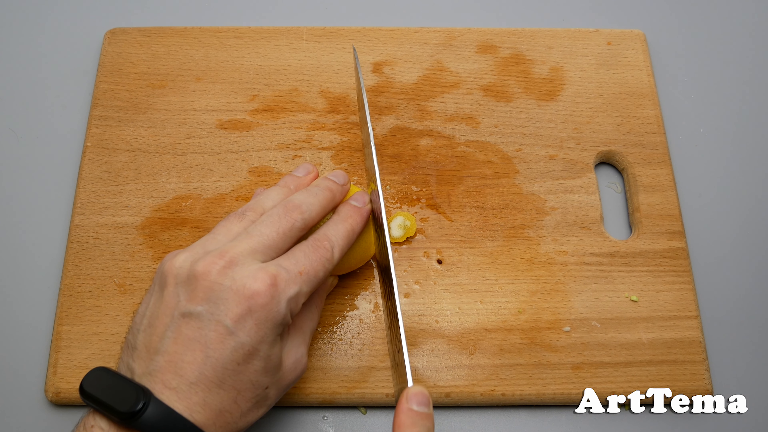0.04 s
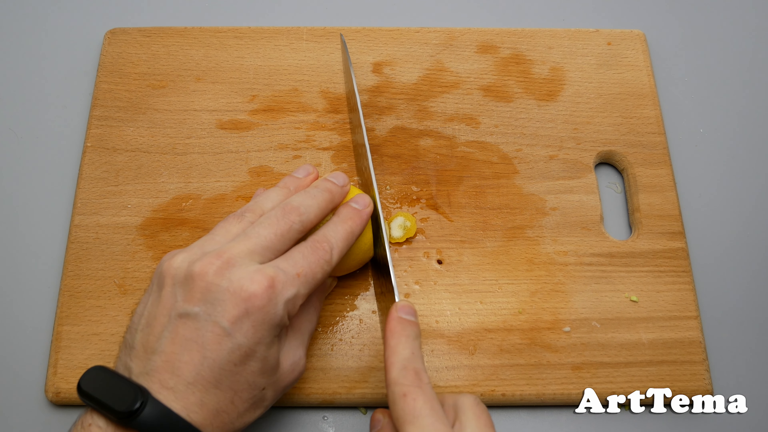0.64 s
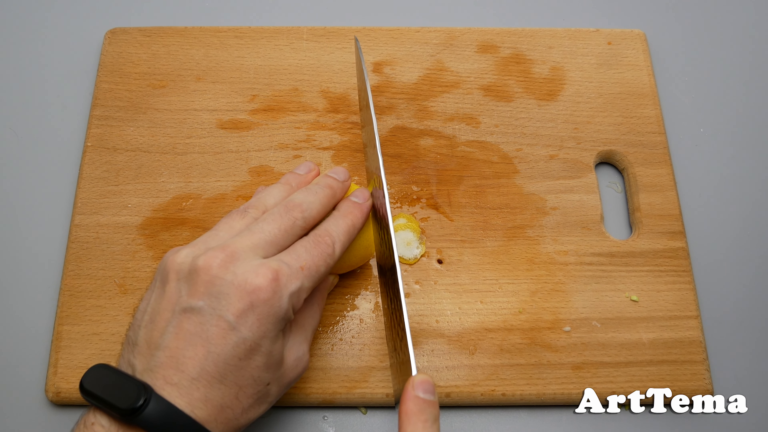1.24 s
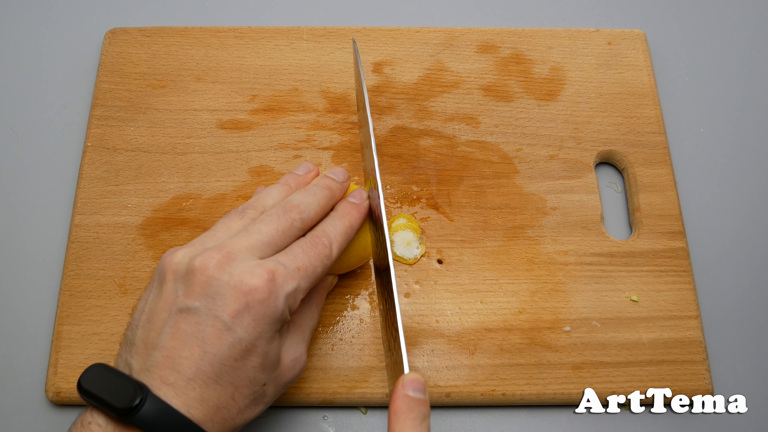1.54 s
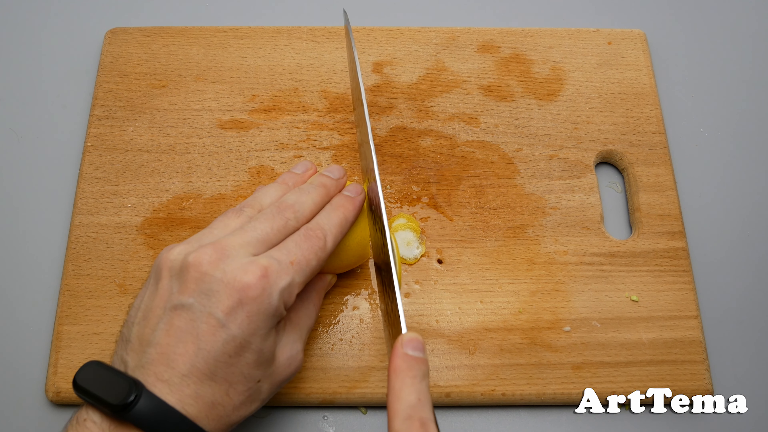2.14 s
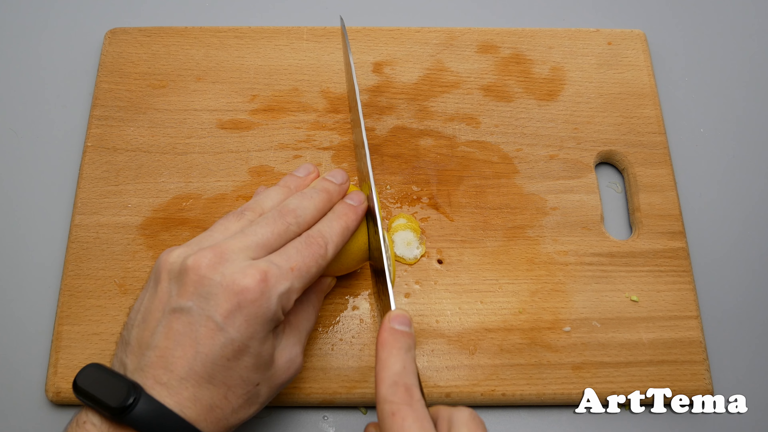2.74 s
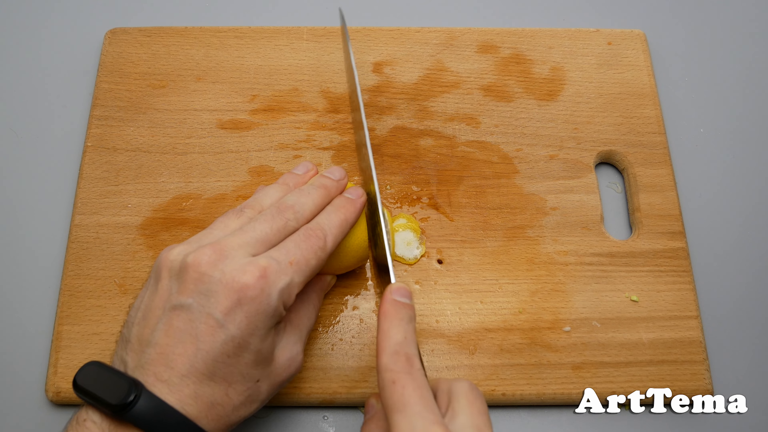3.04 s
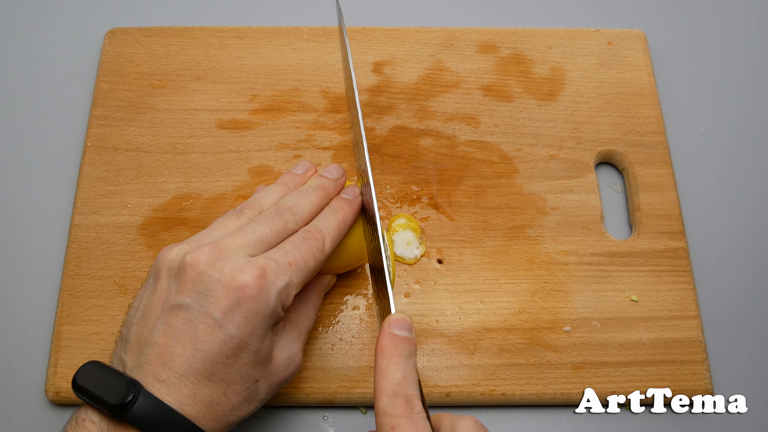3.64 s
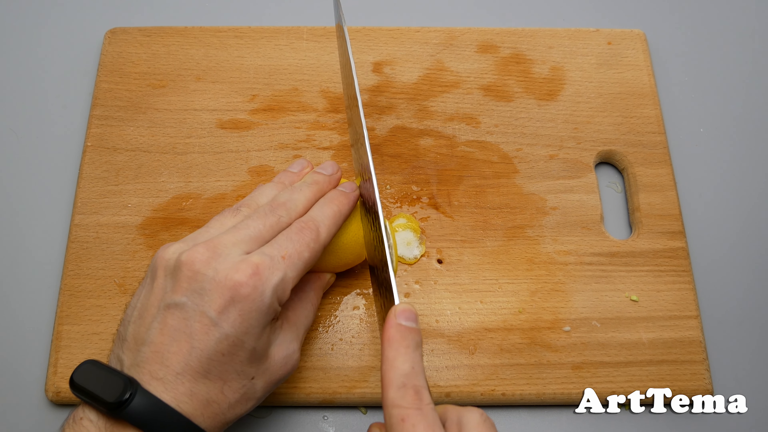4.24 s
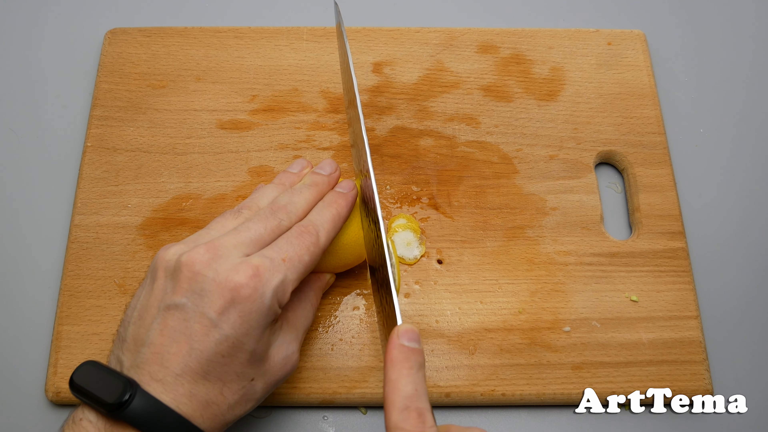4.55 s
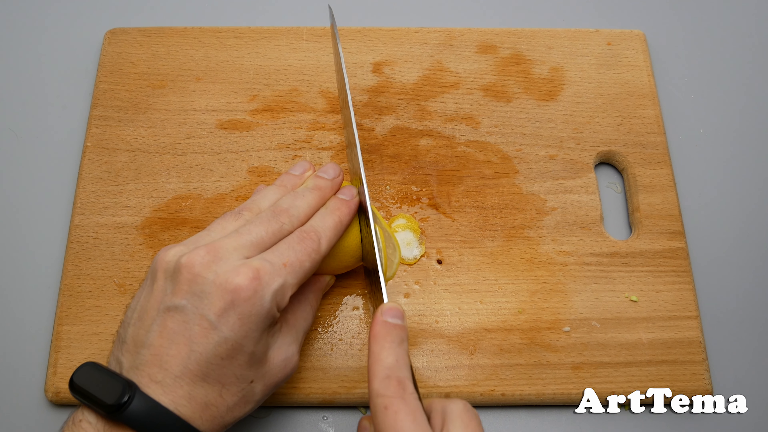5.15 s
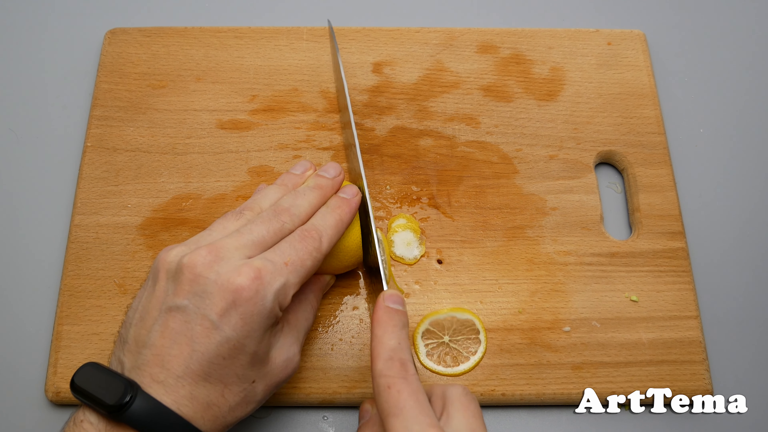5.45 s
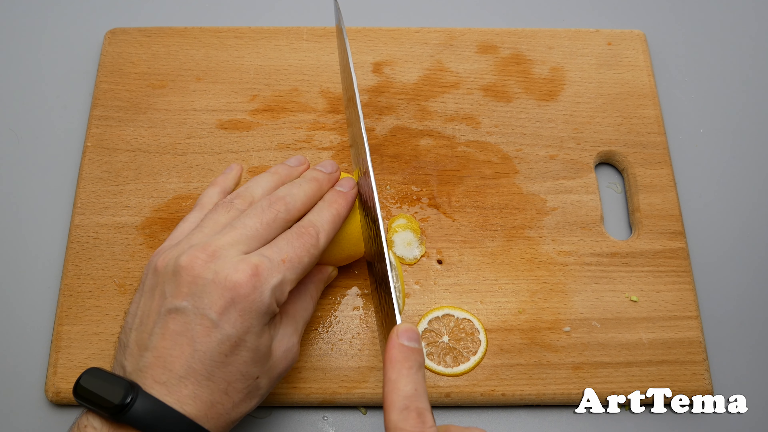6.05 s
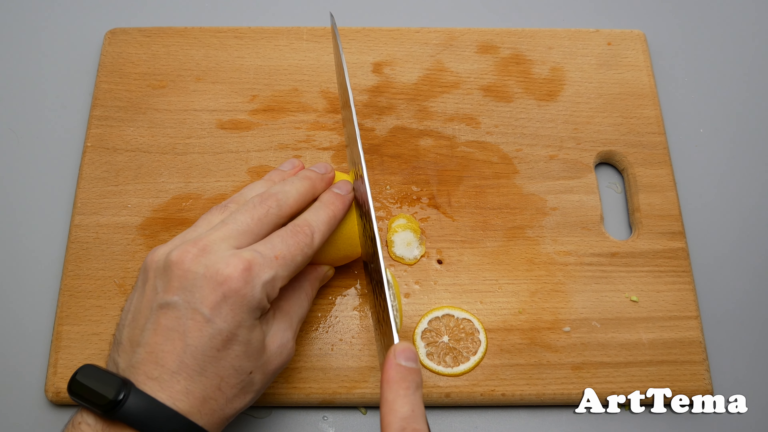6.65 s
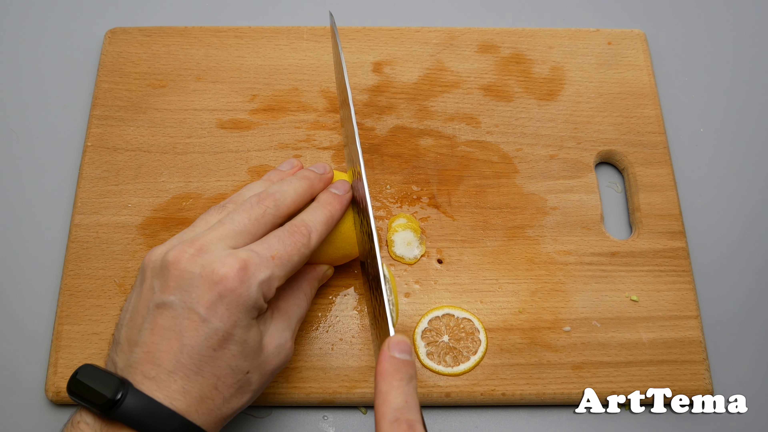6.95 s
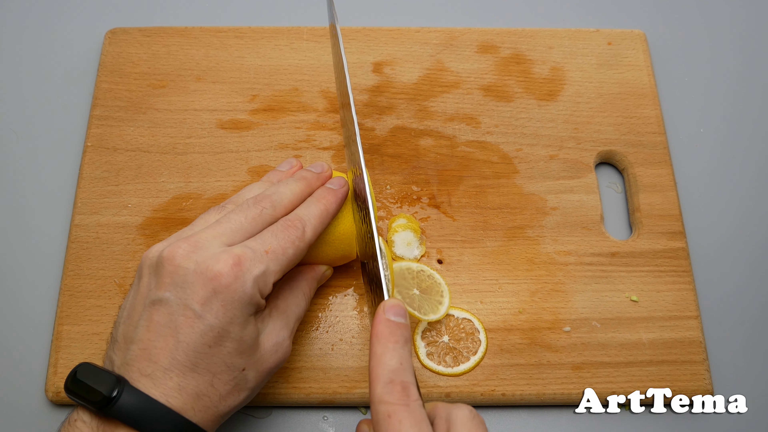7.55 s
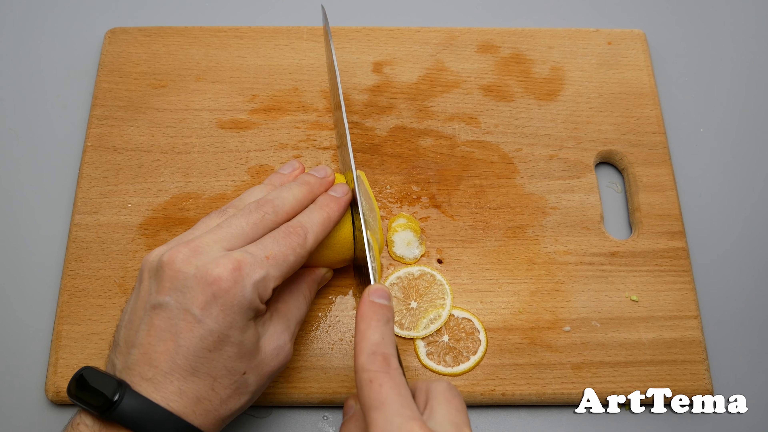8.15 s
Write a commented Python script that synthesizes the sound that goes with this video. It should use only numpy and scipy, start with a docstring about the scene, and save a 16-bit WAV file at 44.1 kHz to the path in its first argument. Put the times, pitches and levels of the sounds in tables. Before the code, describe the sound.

Separate, unhurried knife cuts tear through lemon rind and knock sharply on a wooden board, with faint wet smacks between.

```python
"""Slicing a lemon on a wooden board

A chef's knife, close to the microphone in a quiet kitchen; an appliance drones in the distance.
Each stroke nicks the peel, tears on with a fine hiss of bursting cells, crunches through the lower
rind and, on all but the last, ends in a hard knock on the board that sets the table ringing.
Wet slices smack faintly between the cuts; the knocks just overload the microphone."""
import sys
import numpy as np
from scipy import signal
from scipy.fft import rfft, irfft, next_fast_len
from scipy.io import wavfile

SR = 44100
rng = np.random.default_rng(int(sys.argv[2]) if len(sys.argv) > 2 else 0)


def transcribe(signal):
    """Save signal, clipped to [-1, 1], as a 16-bit WAV file at the path in sys.argv[1]."""
    frames = np.atleast_2d(signal).T
    limited = np.clip(frames, -1, 1)
    pcm = np.round(limited * 32767).astype(np.int16)
    wavfile.write(sys.argv[1], SR, pcm)


N = 365588
TIME = np.arange(N) / SR

# Room tone of the kitchen. Each row: frequency in Hz, relative level in dB.
ROOM_TONE_SPECTRUM = [(15, -58), (25, -43), (48, -35), (69, -20), (101, -21), (135, 2), (186, -13),
                      (286, -10), (394, -15), (637, -15.5), (1060, -24), (3630, -34), (5500, -39),
                      (10300, -55.5), (15000, -73)]
# The room tone arrives from all around. Each row: frequency in Hz, side against middle in dB.
ROOM_TONE_WIDTH = [(40, -1.5), (80, -9.5), (160, -4.5), (320, 3), (640, 2), (1280, 3.5), (2560, -2),
                   (5120, -10.5), (10000, -6)]
# Drone of the distant appliance. Each row: frequency in Hz, width in Hz, relative level in dB.
APPLIANCE_RESONANCES = [(80.6, 3.9, -9), (133.25, 4.4, 0), (181.5, 2.4, 2), (272.4, 10.2, -9.5),
                        (297.4, 6.7, -10), (500.4, 15, -13)]
# Diffuse tail of the kitchen. Each row: octave centre in Hz, level in dB, 60 dB decay in seconds.
KITCHEN_TAIL = [(133.7, -23.5, 0.74), (240.4, -13, .35), (542, -17, 0.43), (1040, -13.5, 0.27),
                (1900, -18.5, .26), (3700, -14.5, 0.17), (7970, -16.5, 0.13)]
# Echoes from surfaces near the board. Each row: delay in seconds, gain as a factor.
NEAR_ECHOES = [(.0069, -0.051), (0.0114, 0.2), (0.014, .15), (.0174, -0.053)]
# Wet smacks and snaps of peel.
# Each row: start in seconds, level in dB, centre in Hz, 60 dB decay in seconds.
WET_SMACKS = [(0.616, -32, 4400, .03), (0.7692, -51, 4280, .04), (1.8557, -39, 4500, .02),
              (1.88, -35, 4600, .03), (3.3128, -44, 4900, .035), (4.81, -61, 10000, .06),
              (5.543, -61, 8500, .07), (5.668, -60, 8000, .08), (5.8314, -42, 5600, .048),
              (5.932, -48, 7000, .03), (6.05, -53.5, 7800, .061), (6.1, -41.5, 4500, .05),
              (6.6248, -56, 6000, .03), (7.712, -40, 3900, .055), (7.7436, -56, 8600, .049)]
# Soft bumps of the fruit on the board. Each row: start in seconds, level in dB.
FRUIT_BUMPS = [(0.226, -39.5), (3.686, -41), (6.405, -42.5)]
# Hiss of the tearing rind. Each row: frequency in Hz, relative level in dB.
RIND_SPECTRUM = [(300, -24), (1300, -11), (2400, 1), (3200, -6), (4200, 3), (5400, 0), (6000, -2.5),
                 (7200, -2.5), (7900, -13.5), (8700, -9), (10400, -9), (12000, -18), (13200, -24),
                 (15000, -42)]
# Fruit and board under the dragging blade. Each row: frequency in Hz, width in Hz, relative level in dB.
FRUIT_RESONANCES = [(135, 23.6, 1.5), (298, 37, 0), (344.4, 44, 2), (599, 44, -3), (800, 130, -10.5)]
# The blade ringing in the fruit. Each row: frequency in Hz, width in Hz, relative level in dB.
BLADE_RESONANCES = [(1720, 140, -12), (2250, 220, -11), (2650, 380, -8), (3380, 160, -8), (4000, 340, -.5),
                    (4540, 200, .5), (4850, 200, .5), (5280, 220, .5), (6060, 260, -8), (6700, 600, -11)]
# The blade nicks the peel, pushes through the flesh and crunches the lower rind; midway the fruit judders.
# Each row: nick time and rise in seconds, nick level in dB, then time in seconds and level in dB for
# each of push, crunch and judder, and last the blade's chatter against the effort in dB.
KNIFE_STROKES = [(0.33, .065, -60, 0.46, -53.4, 0.583, -51, 0.52, -53.5, -22),
                 (1.696, 0.059, -65, 1.77, -53.7, 1.87, -48, 1.84, -45.5, -23),
                 (2.675, 0.019, -55.5, 2.767, -55, 2.957, -46.6, 2.8, -49, -22),
                 (3.726, 0.038, -59.7, 3.83, -52.3, 3.951, -36.5, 3.892, -43, -26),
                 (5.115, 0.03, -58.5, 5.213, -50, 5.361, -38.7, 5.267, -40.5, -17),
                 (7.02, .026, -63.8, 7.145, -51.7, 7.314, -41.5, 7.226, -42.5, -9.5),
                 (8.056, .036, -60.7, 8.16, -49.9, 8.292, -47.5, 8.243, -38.8, -10.5)]
# The board, heavily damped by the hand. Each row: frequency in Hz, level in dB, 60 dB decay in seconds.
BOARD_MODES = [(162.7, -19.5, 0.027), (607.6, 8.5, 0.0077), (719.6, 9.5, 0.0078), (1133, -1.5, 0.011),
               (1160.4, -6, 0.016), (1449, -33, 0.032), (1949, -13.5, .0064), (2640, -4, 0.0027),
               (2825, -19, .0098), (3950, -19.5, 0.0085)]
# The table and its surroundings. Each row: frequency in Hz, level in dB, 60 dB decay in seconds.
TABLE_MODES = [(82.3, -44.5, .62), (129, -40.5, 0.48), (178, -49.5, 0.91), (251, -32, 0.12),
               (281.2, -27, 0.27), (306.2, -26.5, 0.3), (329.3, -31.5, 0.34), (356, -31, 0.27),
               (385.2, -25.5, 0.19), (436, -42.5, 0.57), (505, -41, 0.44), (550, -30, 0.31),
               (609, -26, 0.072), (636, -48.5, 0.55), (630, -41.5, 0.45), (663, -48.5, 0.38),
               (725, -35, 0.21), (748, -44.5, 0.36), (795, -37.5, 0.4), (824, -35, 0.08), (938, -45.5, 0.5),
               (1020, -65, 0.11), (1114, -36, 0.24), (1240, -50, 0.27), (1402, -46.5, 0.22), (59.6, -59, 1),
               (1540, -54, .14), (1694, -51, .14)]
# The edge meets the board.
# Each row: start in seconds, force in dB, hardness as a cutoff in Hz, weight into the table in dB.
BOARD_KNOCKS = [(0.6497, 1.1, 1400, -0.7), (1.9135, 1.6, 1900, -1.6), (3.0006, 1.1, 2800, -1.9),
                (3.9785, 1.5, 3500, -2.4), (5.3809, 0.8, 3100, -1.1), (7.3249, 1.3, 3400, -1.6)]


def from_db(db):
    """Decibels to gain."""
    return 10 ** (np.asarray(db) / 20)


def unit_rms(x):
    """Scale to unit power."""
    return x / np.sqrt(np.mean(x ** 2) + 1e-20)


def colour(x, spectrum):
    """Filter by a smooth curve through points of (Hz, dB)."""
    hz, db = np.transpose(spectrum)
    size = next_fast_len(N)
    bins_hz = np.maximum(np.fft.rfftfreq(size, 1 / SR), 1)
    gain = from_db(np.interp(np.log(bins_hz), np.log(hz), db))
    return irfft(rfft(x, size) * gain, size)[..., :N]


def butter(x, edges_hz, kind, order=2):
    """Causal low-, high- or band-pass."""
    sections = signal.butter(order, np.clip(edges_hz, 10, .45 * SR), kind, fs=SR, output="sos")
    return signal.sosfilt(sections, x + 1e-18)


def resonate(x, resonances):
    """Drive parallel resonances of alternating sign; the sum has unit power."""
    out = 0
    for k, (hz, width_hz, db) in enumerate(resonances):
        radius = np.exp(-np.pi * width_hz / SR)
        poles = [1, -2 * radius * np.cos(2 * np.pi * hz / SR), radius ** 2]
        gain = (-1) ** k * from_db(db) * (1 - radius ** 2) / 2
        out = out + gain * signal.lfilter([1, 0, -1], poles, x)
    return unit_rms(out)


def ringing(modes, lean_spread_db):
    """One second of a struck body; neighbouring modes swing against each other, each leaning to a side."""
    t, out = TIME[:SR], 0
    lean_db = rng.normal(0, lean_spread_db, len(modes))
    for k, (hz, db, t60) in enumerate(modes):
        mode = (-1) ** k * from_db(db - 60 * t / t60) * np.sin(2 * np.pi * hz * t)
        out = out + mode * from_db([[lean_db[k]], [-lean_db[k]]])
    return out


def stereo(pair, side_db):
    """Left and right from two unrelated signals taken as middle and side."""
    return pair[0] + from_db(side_db) * pair[1] * np.array([[1], [-1]])


def grains(per_s, spread_db):
    """Two trains of random clicks of uneven size."""
    sizes = from_db(spread_db * np.minimum(rng.exponential(1, (2, N)), 4))
    signs = rng.choice([-1, 1], (2, N))
    return sizes * signs * (rng.random((2, N)) < per_s / SR)


def flutter(rate_hz, depth_db):
    """A gain that wavers at random."""
    return from_db(depth_db * unit_rms(butter(rng.standard_normal(N), rate_hz, "low")))


def swell(t, peak_s, rise_s, fall_s):
    """A rounded rise to 1 and a rounded fall."""
    return np.exp(-((t - peak_s) / np.where(t < peak_s, rise_s, fall_s)) ** 2)


def add(track, start_s, sound):
    """Mix a sound into the track."""
    at = int(round(start_s * SR))
    track[..., at:at + sound.shape[-1]] += sound[..., :N - at]


def room_tone():
    """Soft, wide noise reaches the microphone from all around."""
    middle, side = unit_rms(colour(rng.standard_normal((2, N)), ROOM_TONE_SPECTRUM))
    return from_db(-53.5) * stereo([middle, colour(side, ROOM_TONE_WIDTH)], side_db=0)


def distant_appliance():
    """A low, wavering drone from far off: noise in a few narrow resonances."""
    drone = resonate(stereo(rng.standard_normal((2, N)), side_db=-11), APPLIANCE_RESONANCES)
    return from_db(-54.5) * butter(drone, 700, "low")


def kitchen_reverb(direct, build_up_s=0.0016):
    """Diffuse reflections build up quickly and die octave by octave."""
    t, response = TIME[:SR // 2], 0
    for hz, db, t60 in KITCHEN_TAIL:
        octave_hz = [hz / np.sqrt(2), hz * np.sqrt(2)]
        band = butter(rng.standard_normal((2, len(t))), octave_hz, "band", order=3)
        tail = band * from_db(-60 * t / t60) * (1 - np.exp(-t / build_up_s))
        tail /= np.sqrt(np.sum(tail ** 2, axis=1, keepdims=True))
        band_share = np.sqrt(2) * hz / SR
        response = response + from_db(db) * np.sqrt(band_share) * stereo(tail, side_db=-7.5)
    return signal.fftconvolve(direct, response, axes=1)[:, :N]


def smacks_and_bumps(bump_hz=620, bump_t60=.07):
    """Surfaces touch or part in a dying burst of tiny clicks: bright for wet slices, dull for bumps."""
    out, t = np.zeros((2, N)), TIME[:SR // 8]
    bumps = [(start_s, db, bump_hz, bump_t60) for start_s, db in FRUIT_BUMPS]
    for start_s, db, hz, t60 in WET_SMACKS + bumps:
        clicks = rng.standard_normal((2, len(t))) * from_db(rng.normal(0, 3.6, len(t)))
        dying = stereo(clicks, side_db=-13) * from_db(-60 * t / t60)
        burst = butter(dying, [hz / 1.8, hz * 1.35], "band", order=3)
        add(out, start_s, from_db(db + 1.5) * burst / np.abs(burst).max())
    return butter(out, 12000, "low", order=6)


def stroke_effort(t, nick_s, nick_rise_s, nick_db, push_s, push_db,
                  crunch_s, crunch_db, judder_s, judder_db):
    """How hard the blade bites and how much the fruit drags over one stroke."""
    lean_db_per_s, give_way_s, stop_s = 14, .036, .0025
    # The nick fades as the blade stalls in the peel.
    nick = from_db(nick_db) * swell(t, nick_s, nick_rise_s, fall_s=0.057)
    # The hand leans ever harder until the lower rind gives way.
    held = swell(t, push_s, rise_s=0.048, fall_s=np.inf) * swell(t, crunch_s, np.inf, give_way_s)
    push = from_db(push_db + lean_db_per_s * (t - push_s)) * held
    crunch = from_db(crunch_db) * swell(t, crunch_s, rise_s=0.034, fall_s=give_way_s)
    judder = from_db(judder_db) * swell(t, judder_s, rise_s=.043, fall_s=.043)
    # Where the board stops the blade, the tearing dies at once.
    landing_s = min((knock[0] for knock in BOARD_KNOCKS if knock[0] > nick_s), default=np.inf)
    moving = np.exp(-np.maximum(t - landing_s, 0) / stop_s)
    cutting = np.hypot(nick, push)
    bite = np.hypot(cutting, crunch) * moving
    drag = np.hypot(from_db(1.5) * cutting, judder) * moving
    return bite, drag


def slicing():
    """Rind cells burst by the thousand; a harder bite rings the blade, and the dragged fruit judders."""
    bursts = stereo(grains(per_s=7000, spread_db=1.5), side_db=-13) * flutter(rate_hz=110, depth_db=0.5)
    bursts *= flutter(rate_hz=25, depth_db=.9)  # the rind yields in uneven surges
    hiss = unit_rms(colour(bursts, RIND_SPECTRUM))
    slips = stereo(grains(per_s=900, spread_db=2), side_db=-10)
    judder = unit_rms(butter(resonate(slips, FRUIT_RESONANCES), 1300, "low"))
    out = np.zeros((2, N))
    for nick_s, *stroke, chatter_db in KNIFE_STROKES:
        now = np.abs(TIME - nick_s) < .5
        bite, drag = stroke_effort(TIME[now], nick_s, *stroke)
        # The fruit grips the blade elsewhere on every stroke and favours other resonances.
        gripped = [(hz, width_hz, db + rng.normal(0, 1.2)) for hz, width_hz, db in BLADE_RESONANCES]
        steel = from_db(0.7) * resonate(bursts[:, now], gripped)
        # A loosely held blade chatters in its lowest resonances.
        loose_blade = resonate(slips[:, now], BLADE_RESONANCES[:3])
        chatter = from_db(chatter_db) * np.hypot(bite, drag) * loose_blade
        ring_share = bite ** 2 / (bite ** 2 + from_db(-43) ** 2)
        tearing = np.sqrt(1 - ring_share) * hiss[:, now] + np.sqrt(ring_share) * steel
        out[:, now] += from_db(1.56) * bite * tearing + from_db(2) * drag * judder[:, now] + chatter
    return butter(out, 12300, "low", order=10)


def board_clack():
    """The struck board clacks briefly, and nearby surfaces return dull echoes."""
    clack = -ringing(BOARD_MODES, lean_spread_db=.3)
    # The free half of the board radiates its higher modes to the right of the microphone.
    clack += 0.19 * butter(clack, 930, "high", order=1) * np.array([[-1], [1]])
    echo = butter(clack, 1330, "low")
    for delay_s, gain in NEAR_ECHOES:
        lag = int(delay_s * SR)
        clack[:, lag:] += gain * echo[:, :SR - lag]
    return clack


def knife_knocks(splash_t60=0.083):
    """The steel edge lands with a tick, the board clacks and the table rings on."""
    board = board_clack()
    table = ringing(TABLE_MODES, lean_spread_db=1.3)
    tick = from_db(-30) * butter(signal.unit_impulse(SR), 9000, "low")
    out = np.zeros((2, N))
    for start_s, force_db, hardness_hz, weight_db in BOARD_KNOCKS:
        # Countless high modes of wood and steel blur into a brief splash.
        noise = stereo(rng.standard_normal((2, SR)), side_db=-9.5)
        splash = unit_rms(butter(noise, [1100, 4500], "band", order=1))
        splash *= from_db(-34.8 - 60 * TIME[:SR] / splash_t60)
        # A softer landing leaves out the high modes.
        body = butter(board + splash + from_db(weight_db) * table, hardness_hz, "low")
        add(out, start_s, from_db(force_db) * (tick + body))
    return out


def scene():
    """Knife, fruit and board close to the microphone, with the quiet kitchen behind."""
    close = slicing() + knife_knocks() + smacks_and_bumps()
    return close + kitchen_reverb(close) + room_tone() + distant_appliance()


def record(dry, cutoff_hz=16400):
    """The microphone overloads on the tallest swings of the knocks; the highest treble is cut."""
    clipped = np.clip(dry, -.98, .98)
    return signal.sosfilt(signal.cheby2(12, 70, cutoff_hz, fs=SR, output="sos"), clipped)


dry = scene()
out = record(dry)
transcribe(out)
```